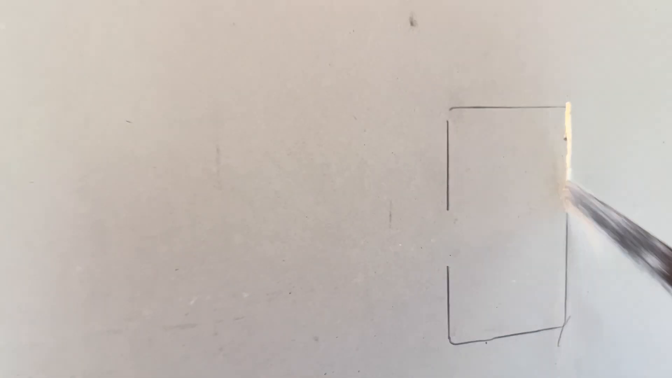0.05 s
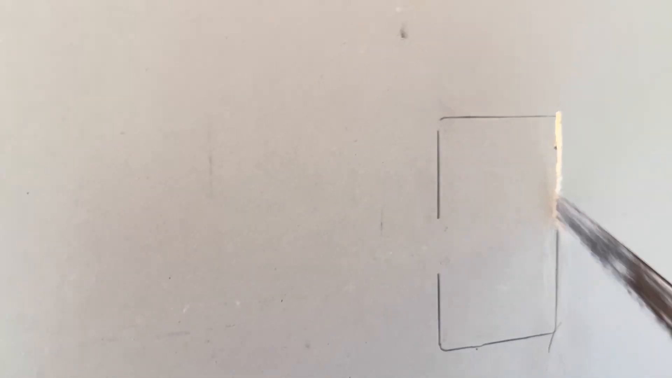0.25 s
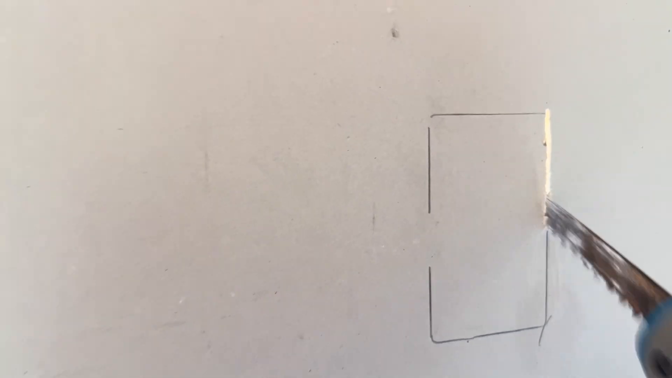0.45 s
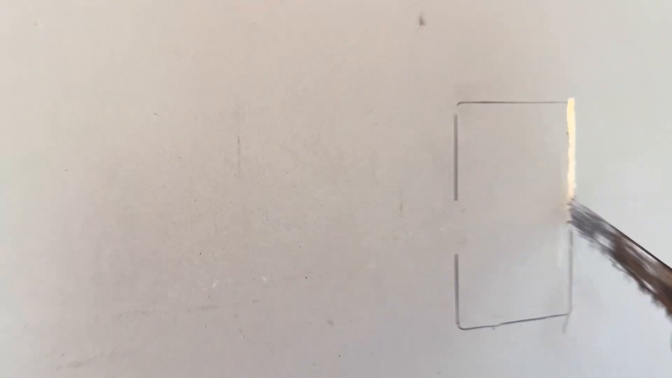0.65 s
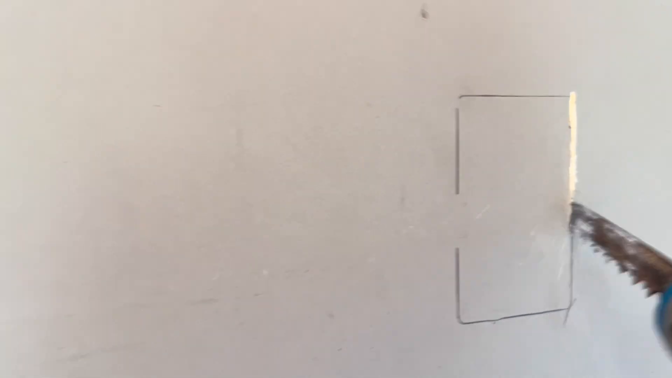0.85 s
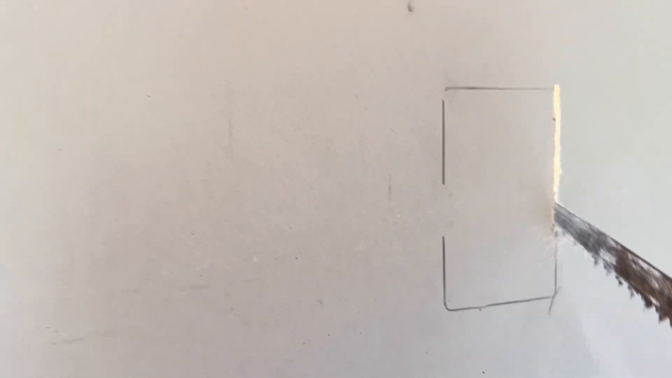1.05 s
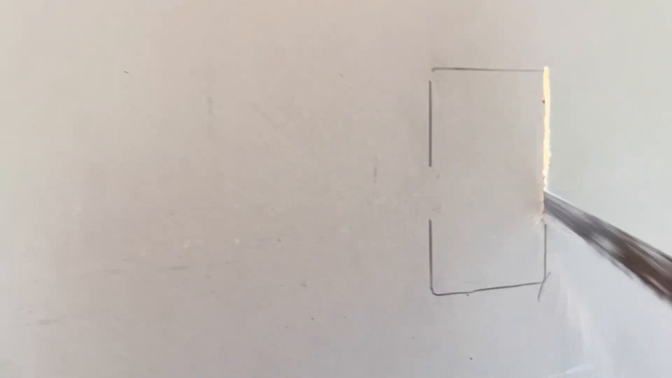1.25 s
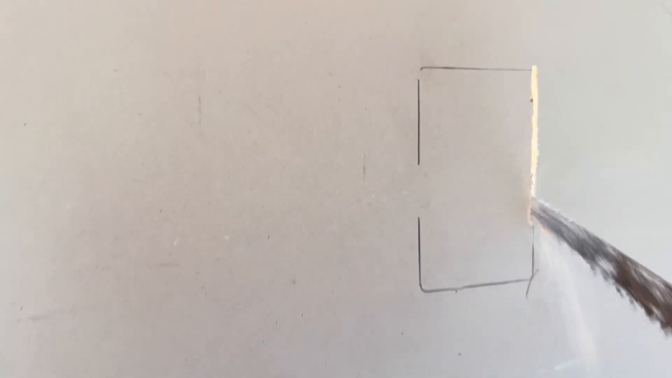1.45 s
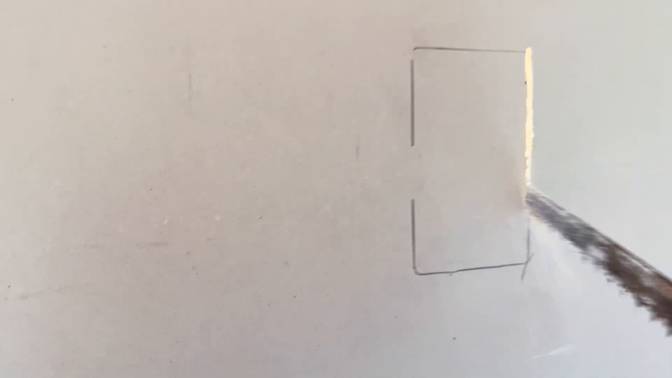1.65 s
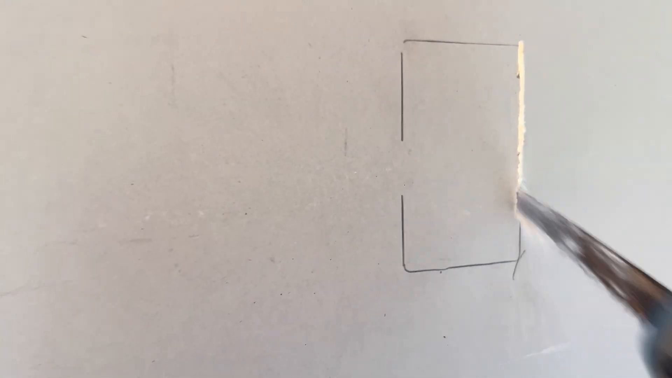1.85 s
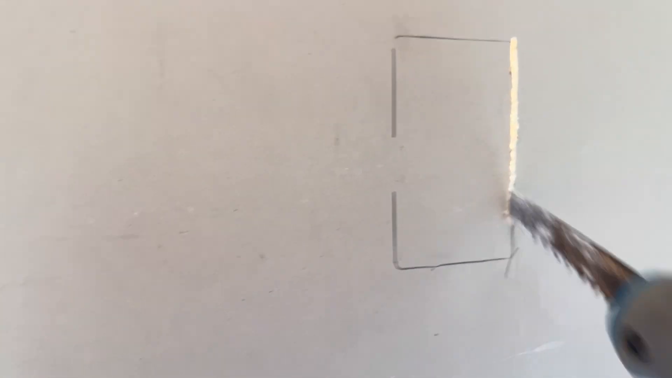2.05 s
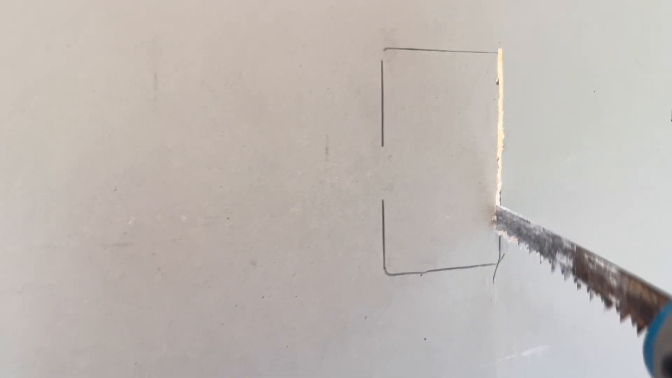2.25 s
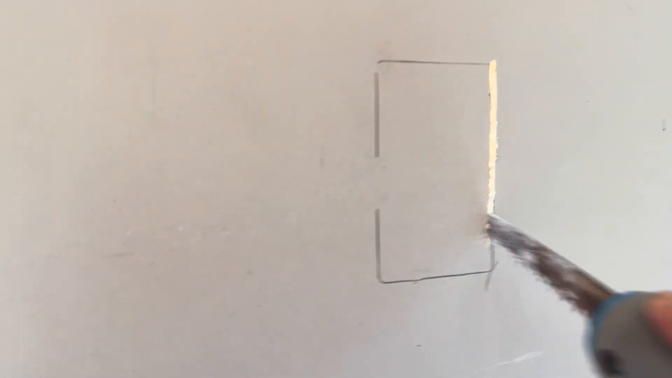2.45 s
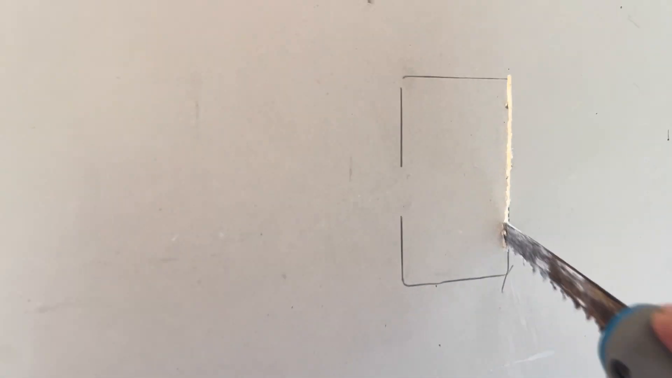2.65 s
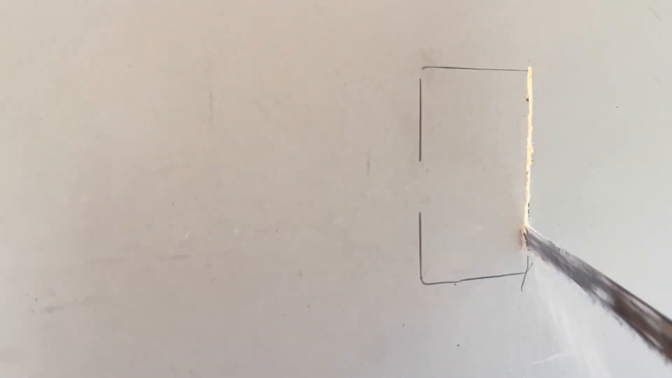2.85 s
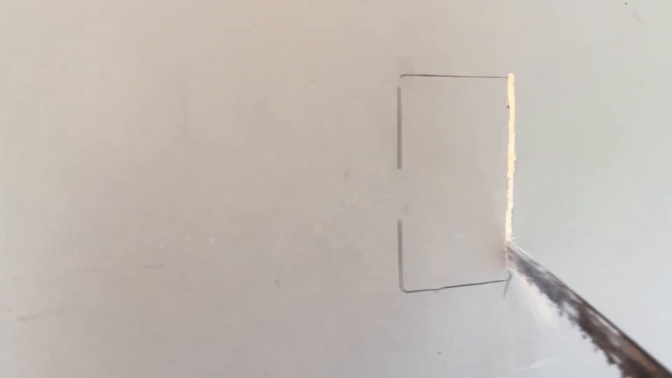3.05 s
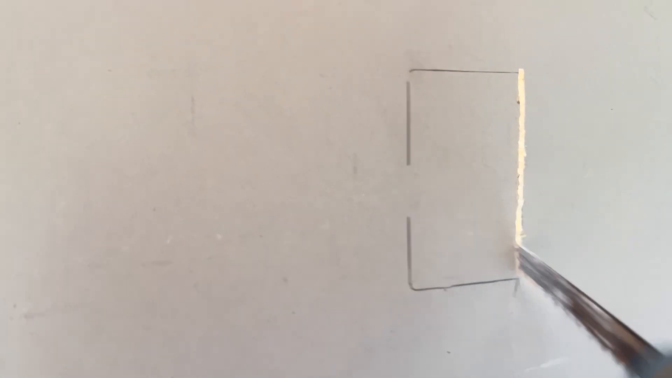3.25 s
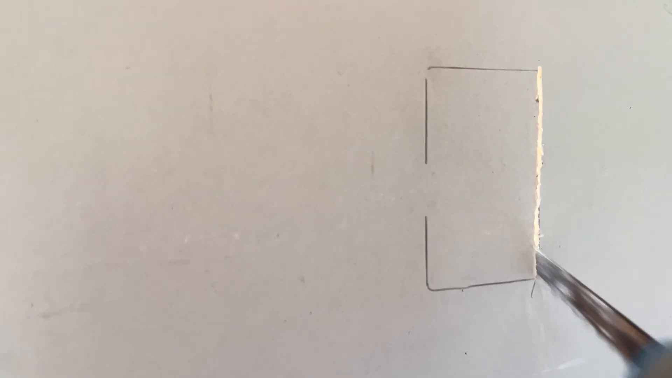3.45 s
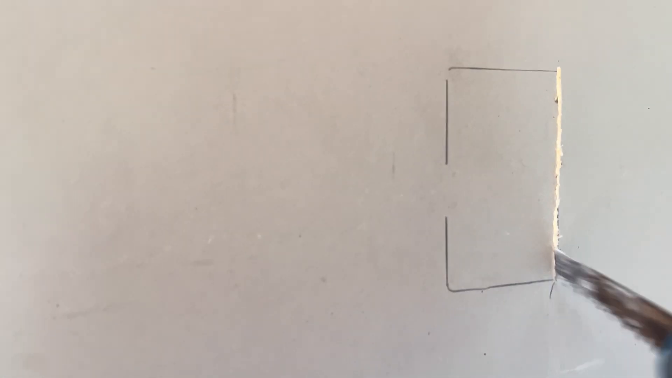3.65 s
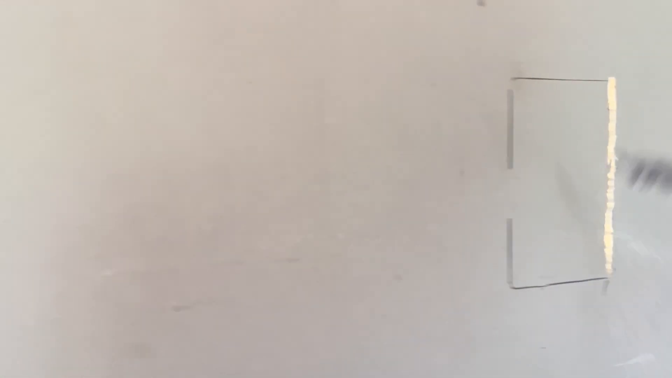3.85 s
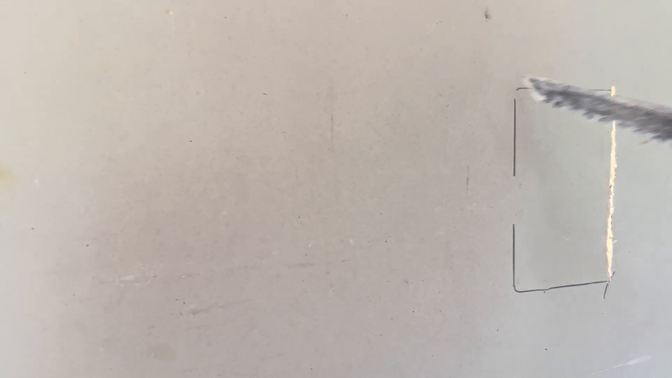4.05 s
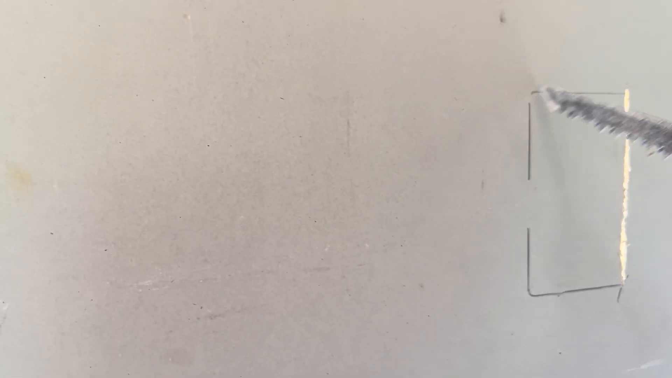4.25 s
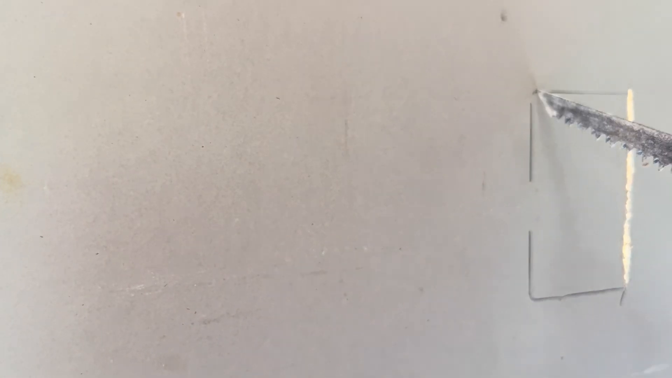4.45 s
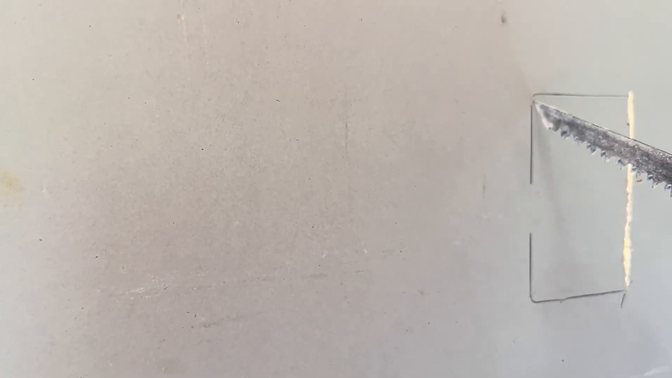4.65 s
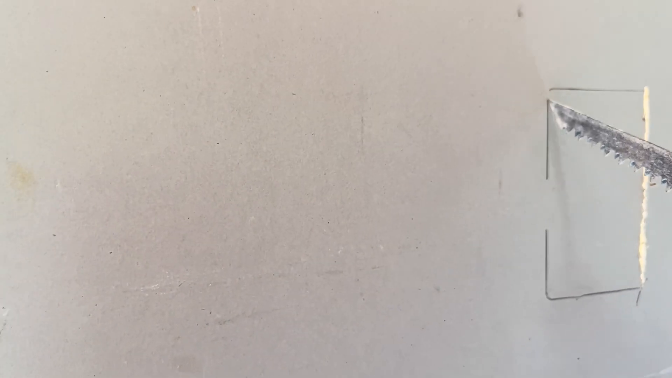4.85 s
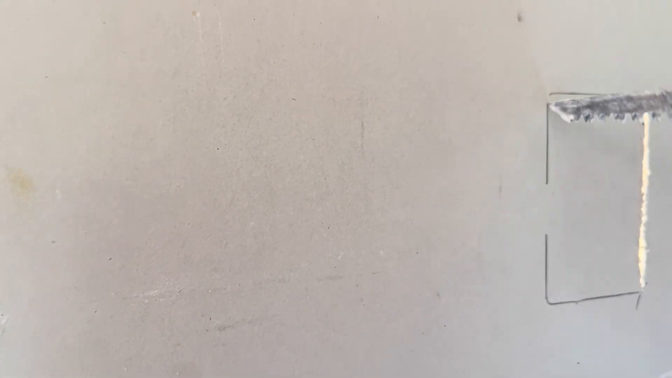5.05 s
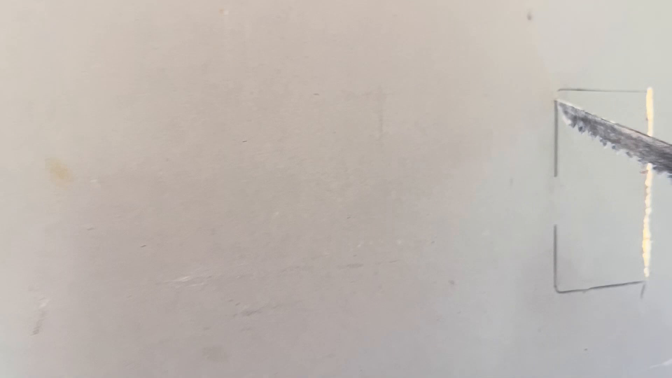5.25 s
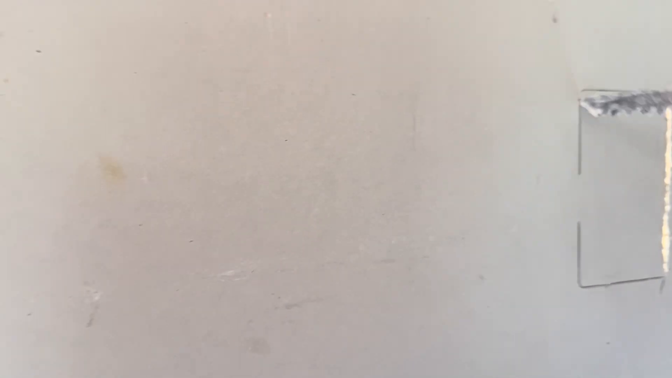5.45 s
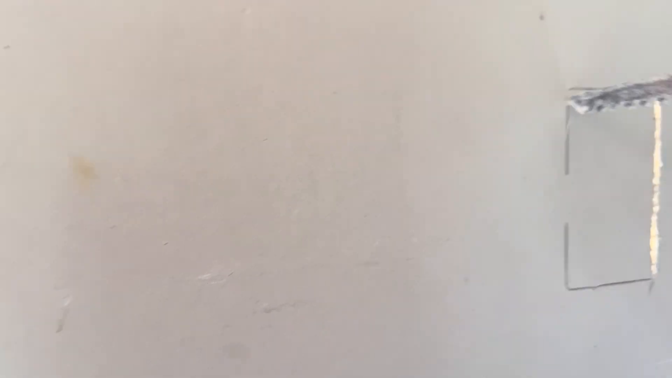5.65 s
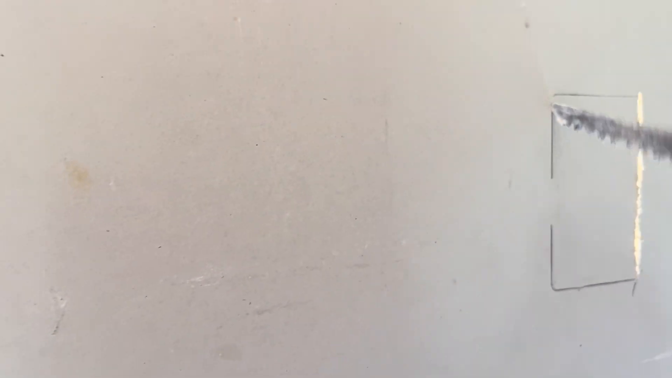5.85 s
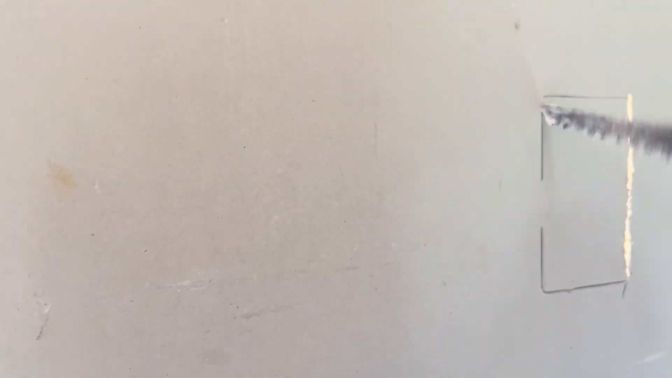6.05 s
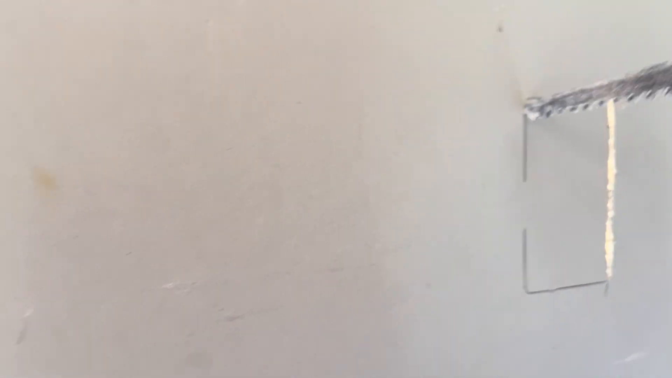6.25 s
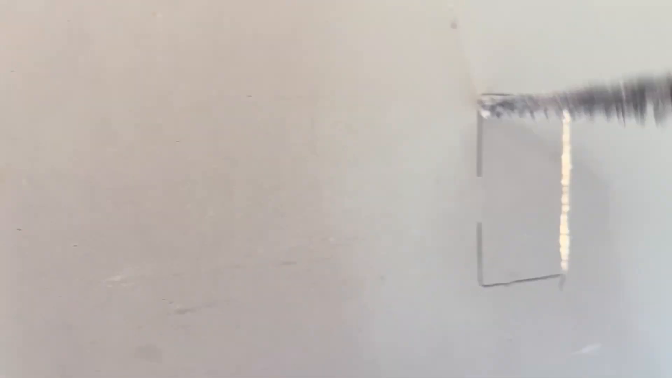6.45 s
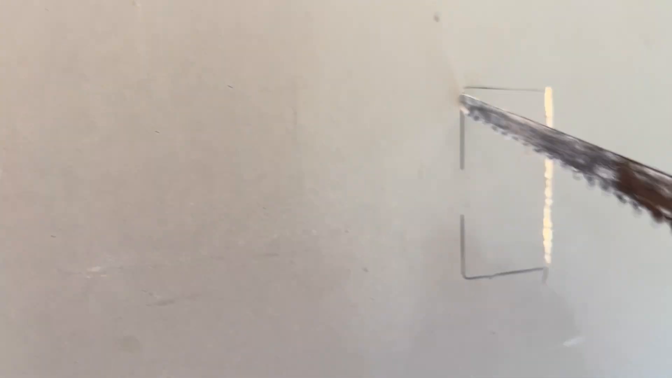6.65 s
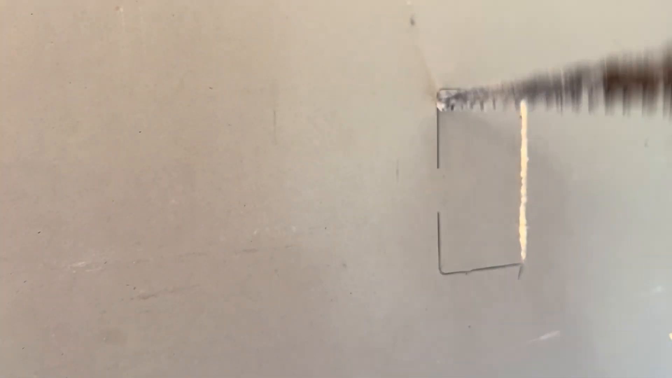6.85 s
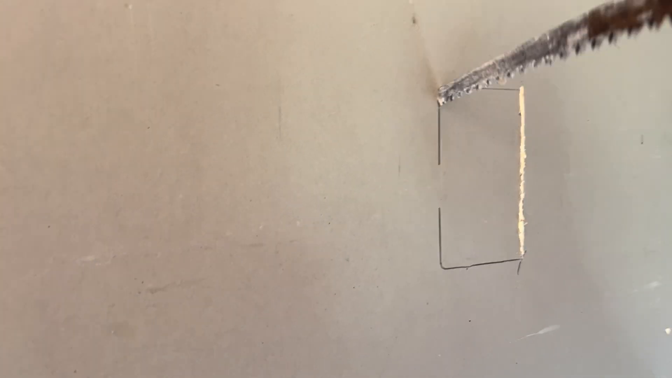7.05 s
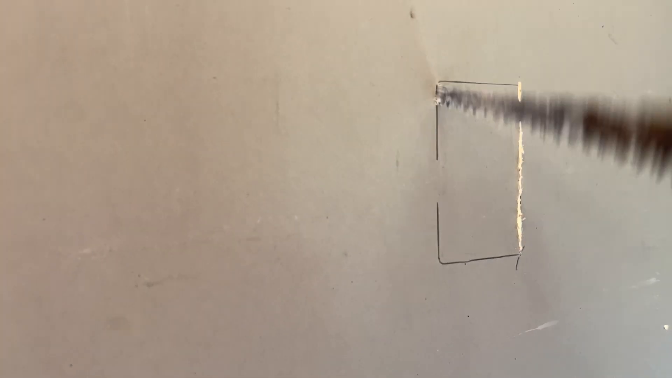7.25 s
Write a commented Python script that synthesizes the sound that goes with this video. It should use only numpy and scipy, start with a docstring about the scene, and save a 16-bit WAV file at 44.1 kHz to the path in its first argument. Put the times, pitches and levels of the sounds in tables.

```python
"""A jab saw cuts down through a plasterboard wall, close to a pair of microphones in a small room.
Each tooth shakes the hollow wall, cracks the board and crumbles gypsum; mostly on the push, teeth snag and let go.
The blade is drawn out and twisted in at a new spot: the tip scratches, scrapes and bumps the wall, the blade clacks.
Forces made of clicks and random grains drive the responses of wall, board, gypsum and steel.
Under it lie a grumble of the wall, a low background rumble and a thin high hiss that swells."""
import sys
import numpy as np
from scipy import signal
from scipy.fft import rfft, irfft
from scipy.io import wavfile
from scipy.ndimage import uniform_filter1d

SR = 44100
rng = np.random.default_rng(int(sys.argv[2]) if len(sys.argv) > 2 else 0)


def store_pcm(level_fs):
    """Save levels as 16-bit WAV."""
    pcm = np.round(np.clip(level_fs, -1, 1) * 32767).astype(np.int16)
    wavfile.write(sys.argv[1], SR, np.atleast_2d(pcm).T)


N = 322371
TIME = np.arange(N) / SR   # seconds
RING_SIZE = 2 ** 14   # samples in an impulse response

# Saw strokes, pull and push in turn. Each row: start in seconds, length in seconds, force in relative dB.
STROKES = [(-.015, .115, -13.5), (.126, .094, -10.5), (.223, .101, -16), (.328, .108, -7.5),
           (.435, .113, -14.5), (.544, .123, -13), (.654, .109, -14), (.757, .128, -10), (.886, .098, -13),
           (.981, .099, -15), (1.116, .087, -16.5), (1.205, .12, -12.5), (1.339, .107, -15.5),
           (1.451, .125, -13), (1.568, .116, -17.5), (1.691, .121, -13.5), (1.797, .116, -15.5),
           (1.938, .102, -12), (2.041, .106, -17), (2.139, .08, -23), (2.292, .076, -29),
           (2.382, .114, -16.5), (2.525, .087, -28), (2.608, .092, -28), (2.728, .112, -17),
           (2.836, .136, -13), (2.972, .107, -18), (3.085, .108, -10.5), (3.191, .125, -17),
           (3.312, .123, -16), (3.419, .109, -20), (3.535, .1, -17.5)]
# The blade slides out of the kerf. One row: start in seconds, length in seconds,
# then wall boom, tooth crunch and gypsum grit in relative dB.
DRAW_OUT = (3.653, .152, -32, -50, -42)
# A tooth snags and breaks free. Each row: time in seconds, strength in relative dB.
SNAGS = [(.113, -16), (.151, -5), (.177, -11), (.342, -23), (.567, -17), (.358, -12), (.611, -9), (.631, 1),
         (.792, -5), (.853, -7), (1.033, -6), (1.26, -10), (1.732, -11), (1.974, -2), (2.179, -8.5),
         (2.42, -11), (2.447, -7), (2.512, -20.5), (2.867, -12), (2.895, -7), (3.116, -14), (3.154, -9),
         (3.183, -11), (3.379, -12.5), (3.403, -13)]
# A lump of gypsum gives way in a spray. Each row: time in seconds, strength in relative dB.
SPRAYS = [(.186, -26), (.386, -19.5), (.609, -24), (3.154, -30), (5.89, -45), (7.278, -35)]
# A crumb of gypsum snaps. Each row: time in seconds, strength in relative dB.
CRUMBS = [(1.818, -17), (2.168, -14), (2.252, -27), (2.688, -17.5), (3.208, -7), (3.650, -16), (5.377, -33),
          (5.588, -25), (5.841, -35), (7.249, -27)]
# Steel scrapes across the paper face. Each row: start in seconds, length in seconds,
# scratch in relative dB, answer of the board in relative dB.
SCRAPES = [(2.303, .056, -45, -41), (2.549, .061, -38.5, -38), (2.66, .06, -50, -31),
           (4.313, .125, -78, -56), (4.598, .076, -72, -59.5), (4.802, .098, -73.5, -57.5),
           (4.986, .081, -59.5, -45.5), (5.24, .053, -62, -54), (6.678, .119, -57, -47),
           (6.82, .1, -51, -46.5), (7.082, .17, -51.5, -44)]
# The tip bumps the wall at each twist. Each row: time in seconds, thud in relative dB, knock in relative dB.
BUMPS = [(4.311, -32.5, -25.5), (5.001, -46, -37.5), (5.034, -42, -39), (5.19, -36.5, -36),
         (5.311, -34, -31), (5.485, -29, -26), (5.618, -34, -27), (5.756, -24.5, -34), (5.89, -26, -29),
         (6.052, -22, -32), (6.184, -31, -40), (6.33, -23, -46), (6.457, -34, -35.5), (6.606, -24, -48),
         (6.736, -37, -48), (6.77, -36, -48), (6.879, -27, -42), (6.999, -37, -33), (7.121, -29, -28.5),
         (7.152, -28, -42), (7.278, -29, -24.5)]
# The blade clacks. Each row: time in seconds, strength in relative dB.
CLACKS = [(5.4112, -18.5), (6.281, -16.5), (6.835, -18.5), (7.277, -27)]
# How hard the hand leans on the tip. Each row: time in seconds, pressure in relative dB.
LEANING = [(3.85, -41), (3.95, -56), (4.96, -57), (5.35, -44.5), (5.7, -44), (5.9, -39.5), (6.3, -41),
           (7.31, -40)]
# The thin high hiss. Each row: time in seconds, level in dB.
HISS_LEVEL = [(3.9, -69), (5.8, -62), (7.3, -59.5)]
# Place of the saw between the microphones. Each row: time in seconds, left over right in dB.
PLACE = [(3.7, 2), (4.3, .7)]
# Modes of the hollow wall. Each row: frequency in Hz, width in Hz, level in relative dB, left over right in dB.
WALL_MODES = [(46.3, 15.2, -11.5, -0.5), (97.5, 15.8, 5, -0.5), (120, 55, -3, 0), (184, 21.1, 1, 5),
              (197.6, 21.06, 1, 3), (216.2, 16.94, -1.5, -2), (272, 28.5, -8, 2), (385, 89.6, -9.5, 0),
              (425.4, 49.2, -12.5, -2.5), (535, 62, -30.5, 10.5)]

# Spectra, of which only the shape counts. Each row: frequency in Hz, density in relative dB per Hz.
# The thud of the shoved board, and the knock of the uncut board under the tip:
THUD = [(30, -5), (70, -2), (120, -2.5), (200, 7.5), (280, -3), (450, -22.5), (900, -58), (3000, -60)]
KNOCK = [(100, -39.5), (200, -12.5), (270, -2), (340, 2.5), (390, 2.5), (450, -7.5), (580, -22), (760, -16),
         (1000, -26), (1250, -38), (1500, -28), (1900, -43), (3000, -46.5)]
# Board cracking under the teeth, and crumbling gypsum:
CRUNCH = [(150, -21), (330, 9), (500, 8), (680, 3), (800, 3.5), (950, 0.5), (1050, -2), (1180, -1.5),
          (1450, -22), (2500, -18.5), (6000, -47.5), (15000, -73)]
GRIT = [(300, -30), (800, 7), (1300, 7), (1800, 2), (2500, 1.5), (3400, 1.2), (4400, -2.3), (5200, -6),
        (6300, -6.5), (7300, -7), (8200, -3.5), (10000, -5), (11200, -6.5), (12500, -11.5), (15700, -9.5)]
# The steel blade struck, the tip scratching paper, and the steel squeaking:
CLACK = [(120, -18), (350, 7.5), (800, 8.5), (1200, 1), (1800, 4.5), (2700, 1.5), (3600, -11), (4400, -6),
         (6500, -12), (8500, -7), (11200, -12), (12500, -23), (15700, -28)]
SCRATCH = [(200, -9.5), (450, 1), (800, 7.5), (1600, 3.5), (2400, -6.5), (4500, -8), (6100, -12),
           (8000, -2), (12000, -49), (16000, -30)]
SQUEAK = [(3000, -35), (5300, -2), (6100, 4), (6800, -24), (10000, -29)]
# The thin high hiss, and the low background rumble:
HISS = [(3000, -46), (6000, -25.5), (7500, -18.5), (8600, 13), (11400, 9), (12200, -33), (14000, -26),
        (16000, -27.5)]
RUMBLE = [(20, -13.5), (45, 7.5), (120, 8), (220, -13), (400, -6), (650, -19.5), (850, -18.5), (1500, -31),
          (3000, -54), (8000, -44)]

# Reflections against direct sound. Each row: frequency in Hz, level in dB.
REFLECTIONS = [(60, -23), (130, -21), (290, -9), (640, 0.5), (1400, -1), (3100, 1.5), (7000, -2.5)]
# Balance of the microphones. Each row: frequency in Hz, left over right in dB.
BALANCE = [(900, -1), (1300, -1), (2400, 1), (4400, 2), (6800, 6.5), (8200, -0.5), (10000, -4)]

# A push bites deep, a pull mostly clears dust. Each row: boom, crunch and grit in dB against the force.
PULL, PUSH = (-.5, -14.5, -20.7), (0, -12.5, -23.3)
# dB of boom, crunch and grit for each dB of force above or below an ordinary stroke
FORCE_LAW, USUAL_FORCE_DB = (1.0, 1.2, .8), -15
GRIT_DB_PER_S = -1.1   # the grit grows fainter as the cut moves down the wall
# Dust is shed as soon as the blade moves, the teeth bite a moment later: boom, crunch and grit in seconds.
LAG_S = (.002, .002, -.004)
LEFT_RIGHT = np.array([[.5], [-.5]])   # splits a left-over-right dB between the channels


def from_db(db):
    """Amplitude factor of a level in dB."""
    return 10 ** (np.asarray(db) / 20)


def rms_one(x):
    """Scale to an rms of 1."""
    return x / np.sqrt(np.mean(x ** 2) + 1e-20)


def energy_one(x):
    """Scale to an energy of 1, so that white noise keeps its rms when filtered."""
    return x / np.sqrt(np.sum(x ** 2))


def at_hz(points, size):
    """A table over frequency, read at the bins of a transform."""
    hz, value = np.transpose(points)
    return np.interp(np.log(np.fft.rfftfreq(size, 1 / SR) + 1), np.log(hz), value)


def response(spectrum):
    """The causal, most compact impulse response that has this spectrum (minimum phase)."""
    cepstrum = irfft(np.log(from_db(at_hz(spectrum, RING_SIZE))))
    cepstrum[RING_SIZE // 2:] = 0
    cepstrum[1:] *= 2
    return energy_one(irfft(np.exp(rfft(cepstrum))))


def play(force, ring):
    """Drive an impulse response with a force."""
    return signal.oaconvolve(force, ring)[:N]


def clicks(times, level_db):
    """One impulse at each time."""
    out = np.zeros(N)
    samples = np.round(times * SR).astype(int)
    out[np.clip(samples, 0, N - 1)] = from_db(level_db)
    return out


def fading(force, t60):
    """Level of the crumbling that follows each impulse, falling 60 dB in t60 seconds."""
    return signal.lfilter([1], [1, -from_db(-60 / (t60 * SR))], force + 1e-18)


def grains(per_s, spread_db):
    """Tiny fractures at random moments, of very unequal size; rms 1."""
    sizes = from_db(spread_db * np.minimum(rng.exponential(1, N), 4))
    signs = rng.choice([-1, 1], N)
    happens = rng.random(N) < per_s / SR
    return rms_one(sizes * signs * happens)


def swing(start, length):
    """Speed of the hand in one stroke: from rest to 1 and back to rest."""
    out = np.zeros(N)
    span = (TIME > start) & (TIME < start + length)
    out[span] = np.sin(np.pi * (TIME[span] - start) / length)
    return out


def stroke_levels():
    """Force and direction set the boom, crunch and grit of each stroke; the last motion draws the blade out."""
    rows = []
    for k, (start, length, force_db) in enumerate(STROKES):
        direction = PUSH if k % 2 else PULL
        extra_force_db = force_db - USUAL_FORCE_DB
        level_db = USUAL_FORCE_DB + np.array(direction) + np.array(FORCE_LAW) * extra_force_db
        boom_db, crunch_db, grit_db = level_db
        rows.append((start, length, boom_db, crunch_db, grit_db + GRIT_DB_PER_S * start))
    return rows + [DRAW_OUT]


def stroke_controls(drag_db=-13.5, drag_t60=1.0):
    """All three levels follow blade speed; between strokes the blade still drags lightly in the kerf."""
    shapes = (0.69, 1.3, 0.8)   # powers of blade speed for boom, crunch and grit
    speed, levels = np.zeros(N), np.zeros((3, N))
    for start, length, *level_db in stroke_levels():
        speed = np.maximum(speed, swing(start, length))
        for level, db, lag, shape in zip(levels, level_db, LAG_S, shapes):
            stroke = swing(start + lag, length)
            moving = stroke > 0
            stroke_level = from_db(db) * rms_one(stroke[moving] ** shape)
            level[moving] = np.hypot(level[moving], stroke_level)
    keep = from_db(-60 / (drag_t60 * SR))
    in_kerf = TIME < DRAW_OUT[0] + DRAW_OUT[1]
    drag = from_db(drag_db) * signal.lfilter([1 - keep], [1, -keep], levels) * in_kerf
    return speed, np.hypot(levels, drag)


def sawing(bite_spread_db=3.5, jitter=.35, crumble_t60=0.03, steady_share=0.2, crunch_db=-2.0, grit_db=-2.0):
    """Teeth pass at a rate set by blade speed; each kicks the wall and sheds a puff of grains."""
    speed, (boom, crunch, grit) = stroke_controls()
    unevenness = np.repeat(np.exp(jitter * rng.standard_normal(N // 128 + 1)), 128)[:N]
    teeth_per_s = (78 + 169 * speed) * unevenness
    passing = np.diff(np.floor(np.cumsum(teeth_per_s) / SR), prepend=0)
    bites = passing * from_db(bite_spread_db * rng.standard_normal(N).clip(-2, 2))
    # the hand keeps the mean force even
    bites /= np.sqrt(uniform_filter1d(bites ** 2, size=2200).clip(0) + 1e-6)
    kicks = bites * rng.choice([-1, 1], N)   # a tooth may drag the board or let it spring back
    puffs = rms_one(fading(bites, crumble_t60))
    shedding = np.sqrt(steady_share + (1 - steady_share) * puffs ** 2)
    cracking = (kicks + shedding * grains(3000, spread_db=3.)) / np.sqrt(2)
    dust = shedding * grains(20000, spread_db=2.2)
    return np.array([boom * kicks, from_db(crunch_db) * crunch * cracking, from_db(grit_db) * grit * dust])


def wall_ring(force):
    """The hollow wall rings in all its modes, each with its own place between the microphones."""
    t, ring = TIME[:RING_SIZE], 0
    for k, (hz, width, level_db, pan_db) in enumerate(WALL_MODES):
        decay = np.exp(-np.pi * width * t)
        mode = (-1) ** k * width * decay * np.cos(2 * np.pi * hz * t)
        ring = ring + mode * from_db(level_db + pan_db * LEFT_RIGHT)
    ring = ring / np.sqrt(np.sum(ring.mean(0) ** 2))
    return np.array([play(force, side) for side in ring])


def level_curve(points):
    """Amplitude over time, drawn straight in dB between the points of a table."""
    return from_db(np.interp(TIME, *np.transpose(points)))


def pressing(rumble_db=-1.0):
    """Unequal small slips under the leaning hand: the force that makes the wall grumble."""
    return from_db(rumble_db) * level_curve(LEANING) * grains(570, spread_db=5.0)


def hiss():
    """A thin high band of noise that swells towards the end."""
    return level_curve(HISS_LEVEL) * play(rng.standard_normal(N), response(HISS))


def background_rumble(level_db=-55):
    """Steady noise, strongest in the bass."""
    return from_db(level_db) * play(rng.standard_normal(N), response(RUMBLE))


def snags(boom_db=19.5, crunch_db=14.5, grit_db=-33., crumble_t60=.045):
    """A caught tooth lets go with a knock and a little dust; now and then a whole lump crumbles."""
    s, strength_db = np.transpose(SNAGS)
    breaks = clicks(s, strength_db + grit_db) + clicks(*np.transpose(SPRAYS))
    spray = fading(breaks, crumble_t60) * grains(18000, spread_db=1.5)
    return np.array([clicks(s, strength_db + boom_db), clicks(s, strength_db + crunch_db), spray])


def crumbs():
    """Single crumbs of gypsum snap, one impulse each."""
    return clicks(*np.transpose(CRUMBS))


def scrapes(paper_squeak_db=-23, sunk_squeak_db=-9, sunk_s=6.5):
    """Short drags: paper fibres tear, the board answers, and the steel squeaks more once it has sunk in."""
    levels = 0
    for start, length, scratch_db, board_db in SCRAPES:
        squeak_db = scratch_db + (sunk_squeak_db if start > sunk_s else paper_squeak_db)
        levels = levels + np.outer(from_db([scratch_db, board_db, squeak_db]), swing(start, length))
    return sum(play(level * grains(4000, spread_db=2.5), response(spectrum))
               for level, spectrum in zip(levels, (SCRATCH, KNOCK, SQUEAK)))


def scratching(scratch_db=-22, tip_lands_s=4.31):
    """Once on the paper, the tip tears fibres at random, louder the harder the hand leans."""
    pressure = level_curve(LEANING) * (TIME > tip_lands_s)
    return play(from_db(scratch_db) * pressure * grains(2500, spread_db=0.5), response(SCRATCH))


def bending(spectrum, delay_at_100_hz_s):
    """Bending waves cross the board slower the lower they are: a thud that falls in pitch."""
    hz = np.fft.rfftfreq(RING_SIZE, 1 / SR)
    phase = 4 * np.pi * delay_at_100_hz_s * 10 * np.sqrt(hz)
    return irfft(rfft(response(spectrum)) * np.exp(-1j * phase))


def bumps(thud_db=25.0, boom_db=26.5, knock_db=21.0, crunch_db=-14.5, scrape_db=-19.5, click_db=-7.,
          travel_s=0.00904, crumble_t60=0.096, paper_pierced_s=4.9):
    """The tip knocks and sends a bending wave through the wall; a harder shove crushes and scrapes more."""
    full_shove_db, grinding_law = -23, .95   # dB of grinding lost for each dB weaker than a full shove
    s, shove_db, rap_db = np.transpose(BUMPS)
    thud = play(clicks(s, shove_db + thud_db), bending(THUD, travel_s))
    knock = play(clicks(s, rap_db + knock_db), bending(KNOCK, travel_s))
    shove = clicks(s + travel_s, shove_db + boom_db)
    grinding_db = full_shove_db + grinding_law * np.minimum(shove_db - full_shove_db, 0)
    in_gypsum = TIME > paper_pierced_s
    grinding = fading(clicks(s, grinding_db), crumble_t60) * in_gypsum
    crush = from_db(crunch_db) * grinding * grains(2000, spread_db=5)
    steel_scrape = from_db(scrape_db) * grinding * grains(4000, spread_db=0.5)
    steel = steel_scrape + clicks(s, rap_db + click_db)
    return shove, crush, thud + knock + play(steel, response(CLACK))


def clacks(rattle_db=-13.5, rattle_t60=0.11):
    """A hard snap of the blade, followed by a short buzz of contacts."""
    s, strength_db = np.transpose(CLACKS)
    rattle = fading(clicks(s, strength_db + rattle_db), rattle_t60) * grains(3500, spread_db=2)
    return play(2 * clicks(s, strength_db) + rattle, response(CLACK))


def burst(t60):
    """A puff of noise that dies away."""
    return rng.standard_normal(RING_SIZE) * from_db(-60 * TIME[:RING_SIZE] / t60)


def broad_colour(spectra):
    """Magnitude of a response, averaged over neighbouring frequencies."""
    return np.sqrt(uniform_filter1d(np.abs(spectra) ** 2, size=70))


def evened(spectra):
    """Keep the fine ripple of a response, level its broad colour."""
    return spectra / broad_colour(spectra)


def room(x, early_t60=.05, late_t60=.26, late_db=-17):
    """Close reflections off wall and hand, then a short tail, different at each microphone."""
    echoes = np.array([rfft(burst(early_t60) + from_db(late_db) * burst(late_t60)) for channel in x])
    paths = evened(1 + from_db(at_hz(REFLECTIONS, RING_SIZE)) * evened(echoes))
    paths /= broad_colour(paths.mean(0))   # level the colour of the two microphones together
    paths *= from_db(at_hz(BALANCE, RING_SIZE) * LEFT_RIGHT)
    lead = 4096   # samples kept for what the levelling spreads ahead of the direct sound
    rings = np.roll(irfft(paths), lead, axis=1)
    return signal.oaconvolve(x, rings, axes=1)[:, lead:lead + N]


def scene(wall_db=-1.5, thud_db=-7.5, knock_db=-6.5):
    """All contacts sound through the same wall, board and gypsum."""
    shove, crush, thuds = bumps()
    boom, crunch, grit = sawing() + snags()
    boom, crunch, grit = boom + shove, crunch + crush, grit + crumbs()
    # the board answers at once near the saw, then the whole wall rings
    near = from_db(thud_db) * play(boom, response(THUD)) + from_db(knock_db) * play(crunch, response(KNOCK))
    wall = wall_ring(from_db(wall_db) * boom + pressing())
    cut = play(crunch, response(CRUNCH)) + play(grit, response(GRIT))
    tip = thuds + clacks() + scratching() + scrapes()
    pan = from_db(np.interp(TIME, *np.transpose(PLACE)) * LEFT_RIGHT)
    return pan * room(near + wall + cut + tip + background_rumble()) + hiss()


def record(dry, low_cut_hz=33, ceiling=0.84, shared_above_hz=8400, right_lead_s=.000279, cutoff_hz=15850):
    """Bass cut and rounded peaks; the top octave is one signal in both channels, shifted in time."""
    x = signal.sosfilt(signal.butter(5, low_cut_hz, "high", fs=SR, output="sos"), dry)
    rounded = x / (1 + (x / ceiling) ** 4) ** (1 / 4)
    left, right = rfft(rounded)
    hz = np.fft.rfftfreq(N, 1 / SR)
    shared = np.clip((hz - shared_above_hz) / 1000 + 1, 0, 1)   # fades in over the 1000 Hz below
    shifted = left * np.exp(2j * np.pi * (hz - shared_above_hz) * right_lead_s)
    right = np.sqrt(1 - shared) * right + np.sqrt(shared) * shifted
    low_pass = np.clip((cutoff_hz - hz) / 200 + .5, 0, 1)
    return irfft(np.array([left, right]) * low_pass, N)


dry = scene()
out = record(dry)
store_pcm(out)
```